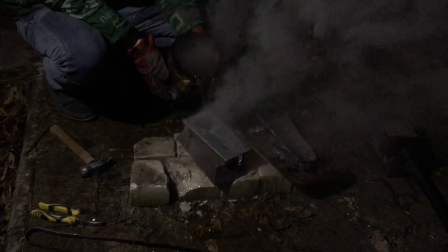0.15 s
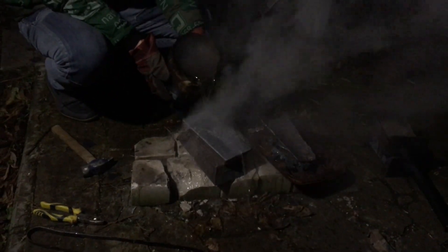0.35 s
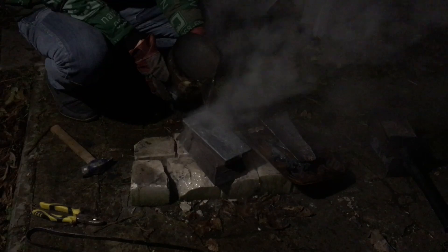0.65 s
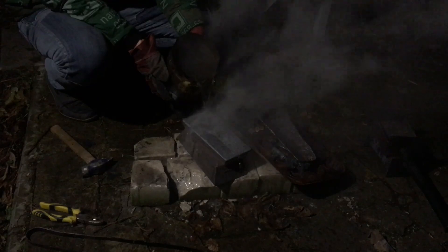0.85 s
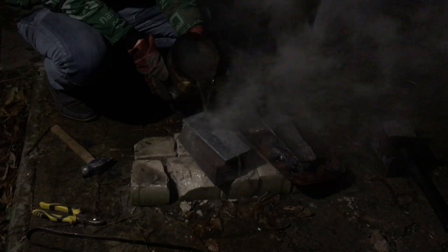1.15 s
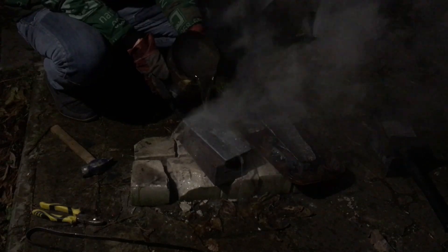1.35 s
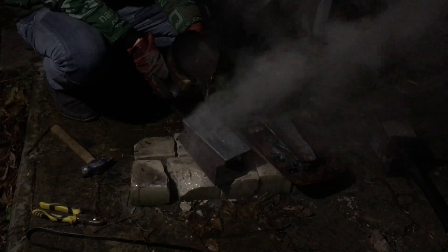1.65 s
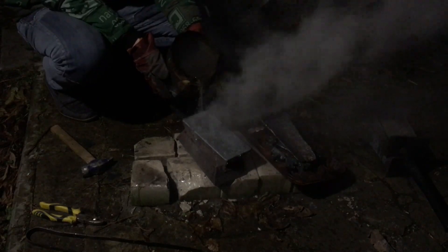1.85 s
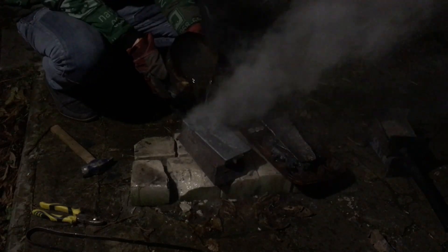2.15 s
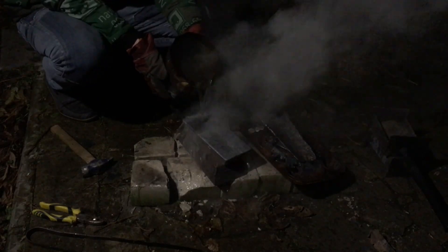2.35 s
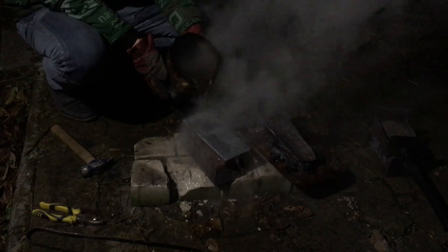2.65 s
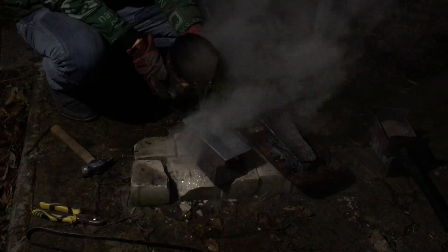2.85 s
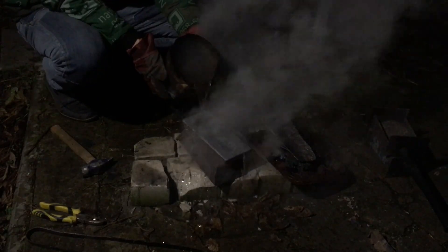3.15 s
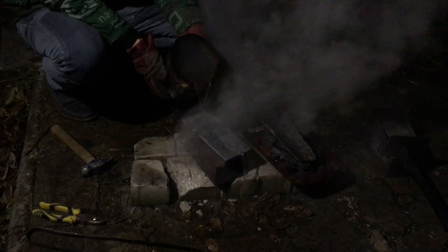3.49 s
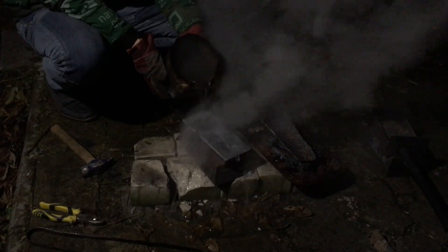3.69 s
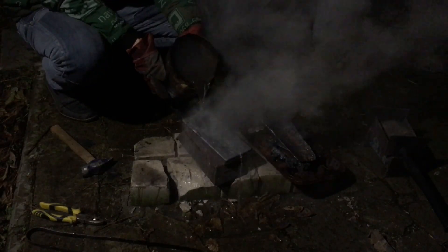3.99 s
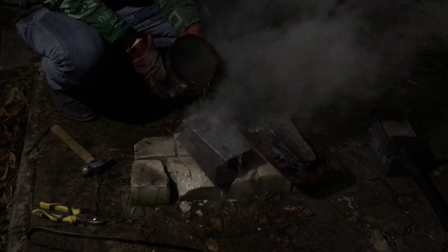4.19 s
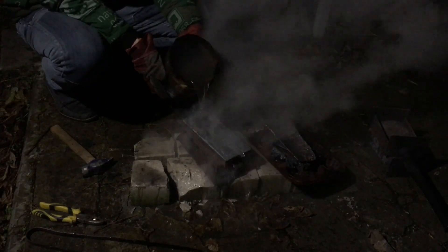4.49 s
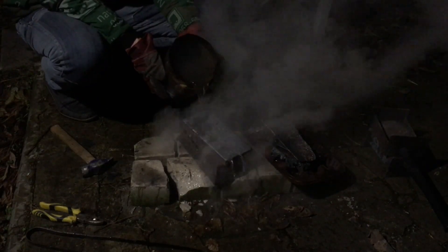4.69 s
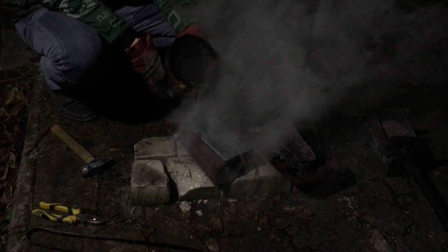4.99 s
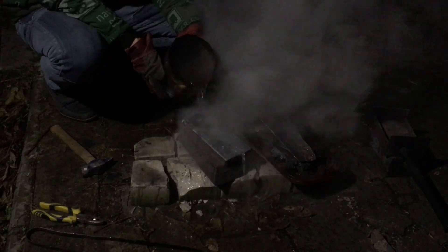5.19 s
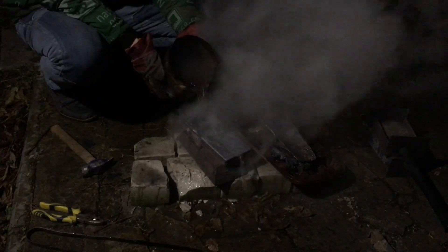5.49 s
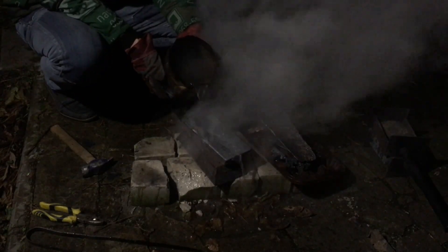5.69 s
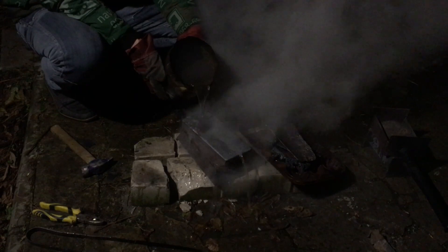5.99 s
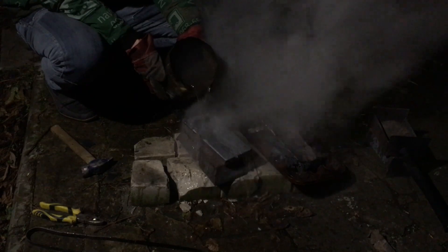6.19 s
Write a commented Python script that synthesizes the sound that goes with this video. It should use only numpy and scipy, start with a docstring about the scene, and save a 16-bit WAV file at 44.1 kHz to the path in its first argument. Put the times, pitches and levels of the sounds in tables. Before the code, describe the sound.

Outdoors, close and in mono, a loud steady sizzle is already under way as molten metal runs into a damp steel mold, and it lasts the whole 6.3 seconds. It is a dense bright fizz mixed with coarser boiling, grainy with tiny spits, over a faint hollow simmer that slowly grows. The level wavers only slightly, dipping near 2.9, 5.2 and 5.8 seconds. From 0.2 to 1.6 seconds trapped steam bursts out in very short, shrill, sliding squeaks and chirpy sputters. From 2.2 to 3.7 the sputters are mostly lower and softer, with scattered ones around 4.1 to 5.5 and a last squeaky cluster at 6.0 to 6.2. Low wind rumble thumps the microphone at about 1.2, 1.6, 2 to 2.4, 3, 3.9 to 4.5 and 5.9 seconds. Short echoes from walls and paving surround the squeaks; quiet outdoor air lies beneath.

```python
"""Pouring molten metal into a damp ingot mold

Outdoors, in mono: melt runs from a crucible into a damp steel mold, and water flashes to steam under it.
The steam is filtered noise: a dense fizz and a coarser boil, both with fine spitting, over a hollow simmer.
Trapped steam sputters out in gliding sine squeaks, their pitch tending to sink as the mold fills.
A light breeze rumbles on the microphone as low noise, with thumping gusts, over quiet outdoor air.
"""
import sys
import numpy as np
from scipy import signal
from scipy.fft import rfft, irfft
from scipy.io import wavfile
from scipy.ndimage import uniform_filter1d

SR = 44100
rng = np.random.default_rng(int(sys.argv[2]) if len(sys.argv) > 2 else 0)


def file_out(sig):
    """Save sig as 16-bit WAV at sys.argv[1]."""
    # one column per channel
    cols = np.atleast_2d(sig).T
    # limit, then scale
    lim = np.clip(cols, -1, 1)
    pcm = np.round(lim * 32767).astype(np.int16)
    wavfile.write(sys.argv[1], SR, pcm)


N = 279594

EDGE_HZ = 15760  # upper band limit of the recorder
BUFFET_DB, BUFFET_HZ = 1.9, 12  # the breeze is never even: rms depth and top rate of its buffeting
GUST_S = 0.023  # half the length of a gust, to 1/e
SQUEAK_S = 0.014  # length of a large squeak
BOUT_RISE_S, BOUT_FALL_S = 0.019, 0.039
SURGE_DB, SURGE_HZ = 0.42, 10  # the boil also surges at random: rms depth and top rate
COARSE_DB, COARSE_DB_PER_S = -2, 0.1754  # large bubbles gain on the fizz as the mold fills
COARSE_FOLLOWS = 0.74  # share of the boil's dB swings that the large bubbles follow
SIMMER_DB, SIMMER_DB_PER_S = -42, 0.51  # the simmer grows steadily with the melt in the mold


def gain_of(db):
    """Decibels to amplitude."""
    return 10 ** (np.asarray(db) / 20)


def evened(x):
    """Scales to an rms of 1."""
    return x / np.sqrt(np.mean(x ** 2) + 1e-20)


def read(points, hz):
    """Reads a spectrum on a log-frequency axis."""
    f, value = np.transpose(points)
    return np.interp(np.log(hz + 1), np.log(f + 1), value)


def follow(rows):
    """The columns of a curve table at every sample."""
    s, *columns = np.transpose(rows)
    return [np.interp(np.arange(N) / SR, s, c) for c in columns]


def add(mix, s, sound):
    """Adds a sound to the mix at time s."""
    part = mix[max(round(s * SR), 0):][:len(sound)]
    part += sound[:len(part)]


def shaped(x, db):
    """Gives x a spectrum, at an rms of 1."""
    return evened(irfft(rfft(x) * gain_of(db), N))


def wavering(top_hz):
    """Slow chance from 2 Hz up, fading out around top_hz, at an rms of 1."""
    hz = np.fft.rfftfreq(N, 1 / SR)
    band = (hz > 2) / (1 + (hz / top_hz) ** 4)
    return evened(irfft(rfft(rng.standard_normal(N)) * band, N))


def breeze():
    """Gusts buffet the microphone as low rumbling noise, over the quiet air of the yard."""
    # strength of the breeze on the microphone: [t/s, level/dB]
    breeze_curve = [(0, -57), (1.05, -60), (1.12, -46), (1.3, -52), (1.55, -41), (1.76, -46), (2.05, -39.5),
                    (2.42, -43.5), (2.55, -52), (2.75, -46.5), (3.4, -45.5), (3.58, -55), (3.76, -44),
                    (3.95, -52), (4.15, -40.5), (4.63, -53), (4.8, -46), (5.45, -50.5), (5.65, -60),
                    (6.2, -52)]
    # the strongest gusts, each a thump on the microphone: [middle t/s, level/dB]
    thumps = [(1.21, -40), (1.625, -31), (1.95, -38), (2.08, -31.5), (2.28, -37), (2.375, -36),
              (2.98, -36.5), (3.86, -39), (4.035, -37), (4.27, -44), (4.35, -34), (4.53, -38.5),
              (5.87, -40)]
    # spectrum of the rumble: [f/Hz, relative level/dB per Hz]
    rumble_spectrum = [(15, -32), (28, -17), (45, 4), (70, 4.5), (100, -7), (150, -15), (250, -30.5),
                       (600, -73)]
    # spectrum of the still outdoor air: [f/Hz, relative level/dB per Hz]
    air_spectrum = [(15, -36), (38, -16), (70, -9), (130, 2), (240, -3), (330, -2), (430, -7), (520, -4),
                    (600, -21), (1200, -23.5)]
    t, hz = np.arange(N) / SR, np.fft.rfftfreq(N, 1 / SR)
    breeze_db, = follow(breeze_curve)
    buffeted = gain_of(breeze_db + BUFFET_DB * wavering(BUFFET_HZ))
    gusts = sum(gain_of(db) * np.exp(-((t - s) / GUST_S) ** 2) for s, db in thumps)
    wind = np.hypot(buffeted, gusts)
    eddies = shaped(rng.standard_normal(N), read(rumble_spectrum, hz))
    strength = uniform_filter1d(abs(signal.hilbert(eddies)) ** 2, size=2600)
    eddies = evened(eddies / np.sqrt(strength))  # the wind alone sets their strength
    air = shaped(rng.standard_normal(N), read(air_spectrum, hz))
    return gain_of(-0.05) * wind * eddies + gain_of(-55) * air


def mold(x):
    """The open mold and the ground give the sound peaks and dips on its way to the microphone."""
    # peaks and dips: [f/Hz, half width to 1/e/Hz, level/dB]
    colour_bands = [(696, 35, 2.5), (1218, 154, 6), (1470, 55, 2.5), (1674, 55, -4), (2122, 21, 4),
                    (3360, 280, 1), (4890, 120, -3), (6200, 420, 1.5), (7690, 330, -2.5),
                    (10400.0, 450, -5), (11350, 320, 0.8)]
    hz = np.fft.rfftfreq(N, 1 / SR)
    colour = sum(db * np.exp(-((hz - f) / width) ** 2) for f, width, db in colour_bands)
    return irfft(rfft(x) * gain_of(colour), N)


def scatter(x, t60):
    """The mold walls, bricks and paving throw back a short spray of echoes."""
    t = np.arange(SR // 5) / SR
    hits = rng.random(len(t)) < 2000 / SR  # 2000 echoes per s
    taps = rng.standard_normal(len(t)) * hits * 1000 ** (-t / t60)
    return signal.fftconvolve(x, taps / np.linalg.norm(taps))[:N]


def squeak(hz, glide, length, rough):
    """A steam pocket whistles unsteadily; its pitch slides (octaves per s) as it swells or shrinks."""
    count = round(length * SR)
    t = (np.arange(count) - count / 2) / SR
    steps = rng.standard_normal(SR // 20)[:count]
    wander = rough * np.cumsum(steps) * np.sqrt(hz / SR)
    turns = np.cumsum(hz * 2 ** (glide * t)) / SR + wander
    return np.sqrt(2) * np.sin(2 * np.pi * turns) * np.hanning(count)


def sputter(length, hz, per_s, spread_hz, glide, spread_db):
    """One bout: a quick, uneven run of small squeaks, scattered around the pitch of the escaping steam."""
    t = np.arange(round(length * SR)) / SR
    out = np.zeros(len(t))
    chance = rng.standard_normal((SR, 3))
    for at in np.flatnonzero(rng.random(SR)[:len(t)] < per_s / SR):
        pitch, slide, size = chance[at]
        sound = squeak(hz + spread_hz * np.tanh(pitch), glide * slide, length=0.00794, rough=0.06)
        add(out, at / SR, gain_of(spread_db * min(size, 2)) * sound)
    rise = np.minimum(t / BOUT_RISE_S, 1)
    fall = np.minimum((length - t) / BOUT_FALL_S, 1)
    return evened(out) * rise * fall


def squirts():
    """Trapped steam escapes in large squeaks and bouts of sputter, with their echoes."""
    # loudest squirts: [middle t/s, pitch f/Hz, level/dB before a common trim, glide/octaves per s]
    large_squeaks = [(.217, 9260, -20, 4.5), (.267, 11470, -19.5, -11.5), (0.374, 8200, -21, -63.5),
                     (.383, 7740, -22, -61.5), (.673, 7400, -22, -58), (0.758, 8250, -20, -18.5),
                     (.833, 8770, -21, 25), (.856, 7770, -27, -40), (.871, 6780, -21.5, -95),
                     (1.032, 11300, -22, 43), (1.326, 8560, -20, 34.5), (1.372, 6400, -23, -110),
                     (1.555, 7250, -22, -28.5), (2.225, 2540, -26, -44), (2.255, 3240, -25, -23),
                     (2.511, 2487, -28, -71), (3.255, 4400, -24, 39), (3.296, 6010, -20, 89),
                     (4.091, 6840, -24, -2.5), (4.308, 2460, -26, 11), (6.067, 2260, -24, -14),
                     (6.08, 3550, -25, 112), (6.192, 2780, -26.5, -29)]
    # bouts of steam sputtering from under the melt: [start t/s, length/s, pitch f/Hz, level/dB]
    bouts = [(0.171, .32, 9210, -31.5), (0.662, 0.26, 8410, -29.5), (1.003, 0.24, 9280, -32.5),
             (1.25, 0.19, 8270, -31), (1.523, 0.085, 7080, -28.5), (2.189, 0.4, 3714, -34.5),
             (2.283, 0.33, 5270, -34.5), (2.584, 0.31, 3905, -35.5), (2.993, 0.32, 3603, -33.5),
             (3.369, 0.36, 3127, -35), (4.274, 0.12, 2680, -37), (4.67, 0.12, 3290, -34),
             (4.799, .17, 6410, -37), (5.238, 0.31, 4790, -40), (6.034, .085, 3104, -30),
             (6.12, 0.1, 2810, -38.5)]
    out = np.zeros(N)
    for s, hz, db, glide in large_squeaks:
        add(out, s - SQUEAK_S / 2, gain_of(db) * squeak(hz, glide, SQUEAK_S, rough=0.082))
    out = gain_of(-1.9) * out  # trims the large squeaks only
    for start, length, hz, db in bouts:
        bout = sputter(length, hz, per_s=450, spread_hz=1253, glide=35.8, spread_db=2.5)
        add(out, start, gain_of(db) * bout)
    return out + gain_of(-13.5) * scatter(out, t60=0.1)


def steam_band(x, low_hz, high_hz):
    """Gives x the spectrum of the steam from one range of bubble sizes."""
    # steam from bubbles of all sizes: [f/Hz, relative level/dB per Hz]
    steam_spectrum = [(300, 2), (550, -22.5), (750, -13.5), (1200, -12.5), (2500, -4), (6000, -3),
                      (9000, 0.74), (15700, -3)]
    hz = np.fft.rfftfreq(N, 1 / SR) + 1
    skirts = -10 * np.log10((1 + (low_hz / hz) ** 10) * (1 + (hz / high_hz) ** 10))
    return shaped(x, read(steam_spectrum, hz) + skirts)


def seething(patchy_db, flicker_db, patch_size):
    """Noise that comes in brief patches of pitch, and flickers as bubbles burst in clusters."""
    z = signal.stft(rng.standard_normal(N), nperseg=256, noverlap=192)[2]
    patches = uniform_filter1d(rng.standard_normal(z.shape), size=patch_size, axis=0)  # across pitch
    patches = evened(uniform_filter1d(patches, size=3, axis=1))  # across time
    flicker = evened(uniform_filter1d(rng.standard_normal(z.shape[1]), size=12))
    z = z * gain_of(patchy_db * patches + flicker_db * flicker)
    return signal.istft(z, nperseg=256, noverlap=192)[1][:N]


def spitting(per_s, spread_db):
    """Tiny droplets burst as clicks; a few are much larger than the rest."""
    size = gain_of(spread_db * np.minimum(rng.exponential(1, N), 4))
    sign = rng.choice([-1, 1], N)
    bursts = rng.random(N) < per_s / SR
    return evened(size * sign * bursts)


def steam():
    """Three sizes of bubble: a hollow simmer, a coarse boil and a fine fizz; spits join the last two."""
    # how hard the water boils: [t/s, level/dB]
    boiling_curve = [(0, -28.5), (.3, -27), (1.06, -29), (1.18, -27), (1.45, -28), (2.22, -28.5),
                     (2.5, -27), (2.62, -29.5), (2.82, -28), (2.93, -30.5), (3.1, -29.5), (3.48, -28.5),
                     (3.82, -30), (4.1, -28), (4.22, -29.5), (4.31, -27.5), (4.45, -28.5), (4.9, -28),
                     (5.16, -30.5), (5.48, -28), (5.6, -29), (5.76, -29), (5.83, -31.5), (6.1, -28.5),
                     (6.34, -31)]
    t = np.arange(N) / SR
    boiling_db, = follow(boiling_curve)
    spits = gain_of(-7.5) * spitting(per_s=3000, spread_db=3.5)
    simmer = seething(patchy_db=0.5, flicker_db=0.0, patch_size=3)
    simmer = steam_band(simmer, low_hz=528, high_hz=1905)
    boil = seething(patchy_db=0.56, flicker_db=0.8, patch_size=6) + spits
    boil = steam_band(boil, low_hz=1770, high_hz=6460)
    fizz = seething(patchy_db=0.84, flicker_db=0.49, patch_size=8) + spits
    fizz = steam_band(fizz, low_hz=6430, high_hz=17500)
    usual_db = boiling_db.mean()
    swing_db = boiling_db - usual_db + SURGE_DB * wavering(SURGE_HZ)
    coarse_db = COARSE_FOLLOWS * swing_db + COARSE_DB + COARSE_DB_PER_S * t
    sizzle = gain_of(swing_db + 4.0) * fizz + gain_of(coarse_db) * boil
    return gain_of(usual_db) * sizzle + gain_of(SIMMER_DB + SIMMER_DB_PER_S * t) * simmer


def scene():
    """The breeze at the microphone and the steaming mold, the same in both channels."""
    return np.tile(breeze() + mold(steam() + squirts()), (2, 1))


def record(dry):
    """The recorder's band limit: a steep low-pass."""
    low_pass = signal.firwin(1023, EDGE_HZ, window=("kaiser", 9), fs=SR)
    return signal.oaconvolve(dry, low_pass[None], "same")


dry = scene()
out = record(dry)
file_out(out)
```